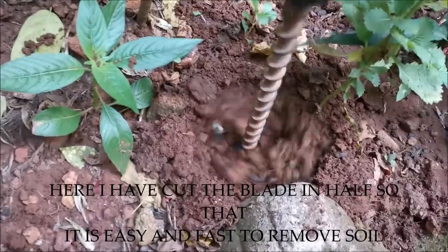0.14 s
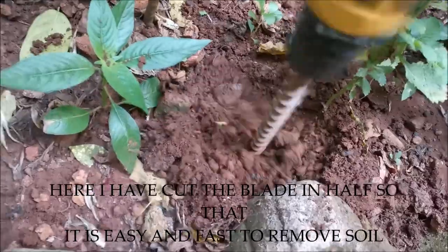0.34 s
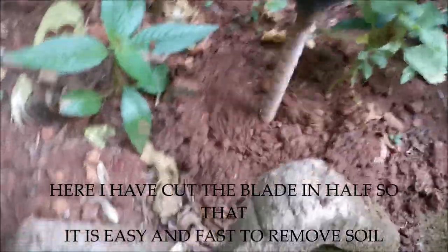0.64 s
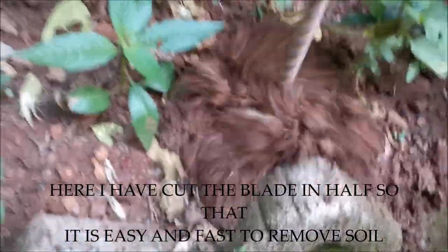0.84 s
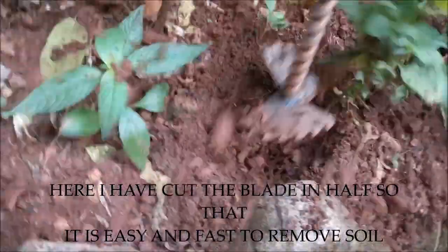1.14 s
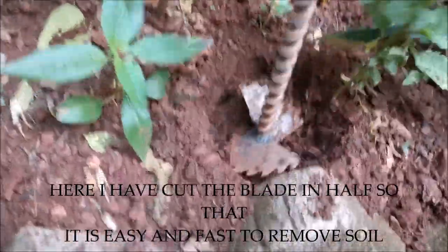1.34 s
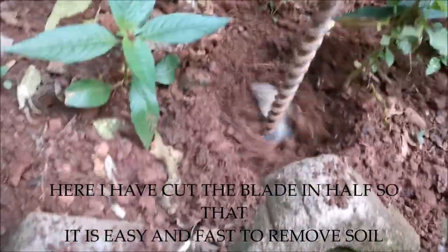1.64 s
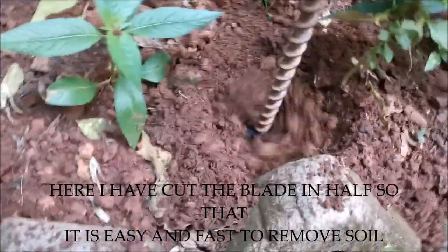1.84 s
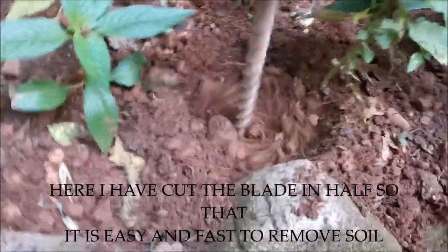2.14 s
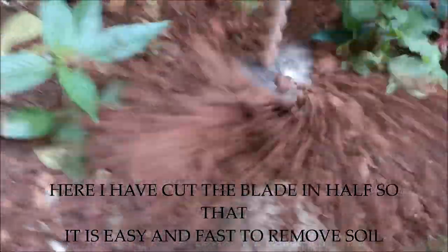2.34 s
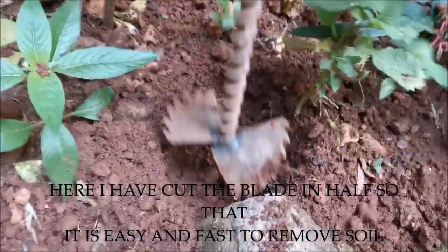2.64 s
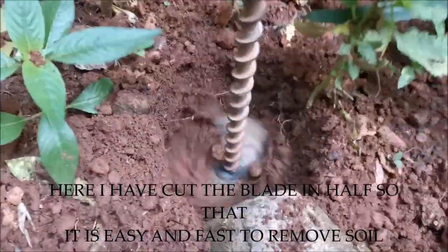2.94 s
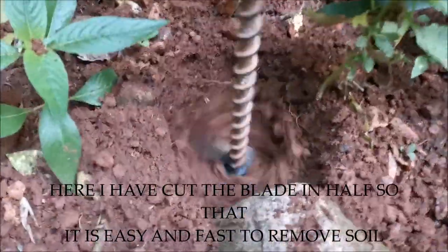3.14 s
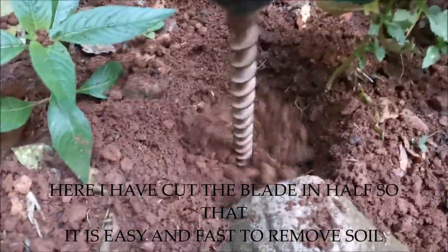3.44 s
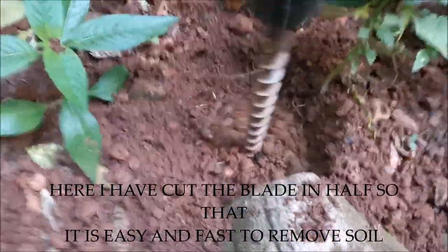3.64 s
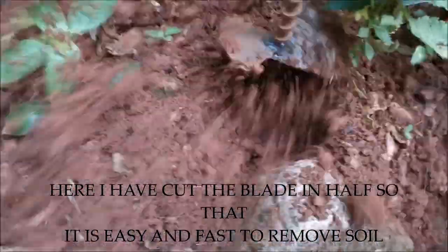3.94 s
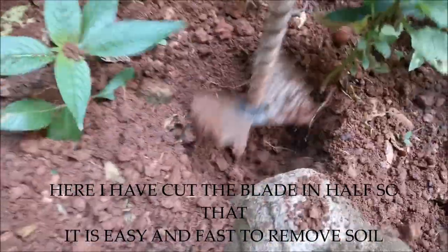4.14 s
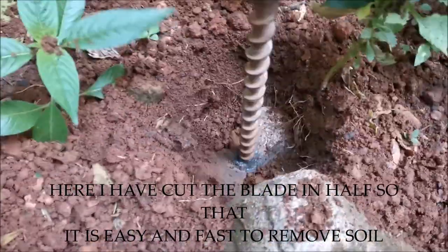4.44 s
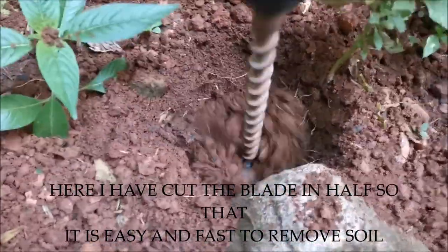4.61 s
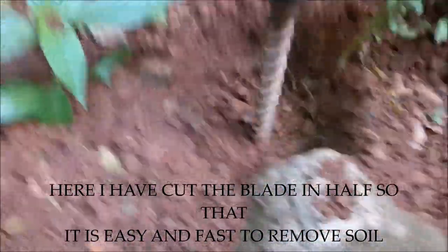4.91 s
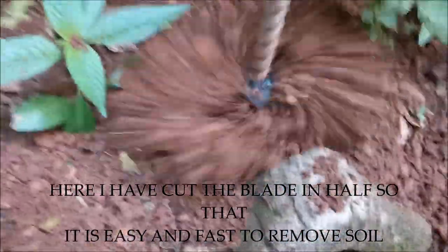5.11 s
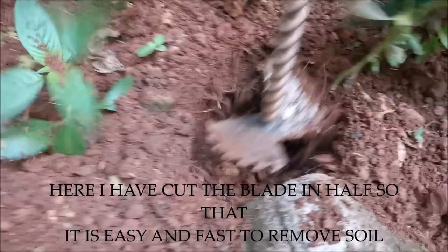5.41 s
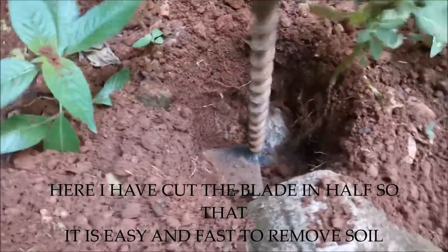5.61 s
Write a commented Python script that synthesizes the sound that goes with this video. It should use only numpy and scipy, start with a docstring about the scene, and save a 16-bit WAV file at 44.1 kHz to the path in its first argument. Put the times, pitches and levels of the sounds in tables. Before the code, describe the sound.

A hand-held electric drill turns a digging blade in earth, recorded near, dry and slightly dull on top. It revs, clacks, whines and rasps, its pitch dipping and recovering under load, then brakes with a falling growl. This happens four times, with quiet gaps of dull thuds, crunches, small pebble ticks and trickling dirt over faint still air.

```python
"""Outdoors, close to a camera: a cordless drill spins a home-made auger into loose soil in four bursts.
Each burst starts with a squeal and a clack; hum and whine follow the motor speed, which sags as the blade bites.
Grains of noise, throbbing with the rotor, make the rattle, scrape and hiss.
Short noise bursts make the clacks, the blade's knocks in the hole and its ticks; thrown crumbs trickle down."""
import sys
import numpy as np
from scipy import signal
from scipy.fft import rfft, irfft, next_fast_len
from scipy.io import wavfile
from scipy.ndimage import uniform_filter1d, map_coordinates

SR = 44100
rng = np.random.default_rng(int(sys.argv[2]) if len(sys.argv) > 2 else 0)


def store_wav(level_fs):
    """Save 16-bit WAV to argv[1]."""
    pcm = np.round(np.clip(np.atleast_2d(level_fs), -1, 1) * 32767)
    wavfile.write(sys.argv[1], SR, pcm.T.astype(np.int16))


N = 254456
TIME = np.arange(N) / SR  # seconds

# pulls of the trigger: (motor starts [s], spindle catches [s], motor stands [s])
PULLS = [(.062, .128, 1.172), (1.645, 1.708, 2.577), (3.006, 3.074, 4.062), (4.624, 4.685, 5.405)]
# grip and soil change the mix of each burst:
# (hum trim [dB], gear line 1, 2, 3 trims [dB], scrape trim [dB], coasting rattle level [dB])
PULL_MIX = [(-2, 3, -0.68, 0.5, -1, -47.5), (-1.5, 0.5, -1, -9.5, -1.5, -41.5), (1, -3, 1.6, 3.5, 0, -48.5),
            (0.5, -4, 0, -2.5, -1, -39.5)]
# blade and clods hit the ground, levels before the layer trims:
# (time [s], crunch level [dB], thud level [dB], time to fall 60 dB [s])
GROUND_KNOCKS = [(.29, -25.5, -35, 0.14), (.835, -44, -37, 0.088), (1.237, -51, -30.5, 0.026),
                 (1.358, -44, -40, 0.078), (1.388, -32.5, -37, 0.12), (1.579, -40, -62, 0.047),
                 (2.794, -51, -29.5, 0.041), (2.823, -59, -42, 0.088), (2.9, -65, -35, 0.025),
                 (2.929, -56, -45, 0.03), (3.307, -35, -29.5, 0.058), (3.485, -29, -26, .071),
                 (4.139, -40.5, -66, 0.099), (4.24, -32, -53, .072), (4.312, -37, -89, 0.041),
                 (4.41, -47, -82, 0.022), (5.5426, -29, -40, 0.064), (5.553, -34.5, -39, 0.096),
                 (5.582, -57, -39.5, 0.094)]

FREE_SPEED = 260  # motor turns per second with no load
REV_ATTACK_S, REV_RELEASE_S = .022, .013  # the surge of the run-up comes and goes
COAST_S, COAST_PEAK_S = .34, .066  # before the stand: the gears begin to run slack, and rattle most
REV_RATTLE_DB, REV_SCRAPE_DB = -40.5, -44  # what the surge adds, before any layer trim
RATTLE_DB = -4.5  # against the drive


def amp(db):
    """Turn decibels into gain."""
    return 10 ** (np.asarray(db) / 20)


def unit(x):
    """Scale to an rms (average strength) of 1."""
    return x / np.sqrt(np.mean(x ** 2) + 1e-20)


def ramp(times, values):
    """Draw straight lines through a few moments, one value per sample."""
    return np.interp(TIME, times, values)


def curves(rows):
    """Give one value per sample for each column after the time."""
    times, *columns = np.transpose(rows)
    return [ramp(times, column) for column in columns]


def along(points, hz):
    """Read (frequency [Hz], level [dB]) points on a log frequency axis."""
    f, db = np.transpose(points)
    return np.interp(np.log(hz + 1), np.log(f), db)


def dying(start, db, db_per_s):
    """Make a gain that sets in at start and falls steadily in decibels."""
    age = TIME - start
    return (age > 0) * amp(db - db_per_s * np.abs(age))


def wobble(rate):
    """Draw a smooth random curve with rate knots a second."""
    knots = rng.standard_normal(int(N * rate / SR) + 4)
    return map_coordinates(knots, [np.arange(N) * rate / SR])


def colour(x, points):
    """Filter to a spectrum of (frequency [Hz], level [dB]) points, with unit power gain and no pre-echo."""
    m = 2 * next_fast_len(N // 2 + 8192, True)
    hz = np.fft.rfftfreq(m, 1 / SR)
    top_hz = points[-1][0]
    gain = amp(along(points, hz)) / (1 + (hz / (2 * top_hz)) ** 4)
    # folding the cepstrum makes the filter answer only after its input
    cepstrum = irfft(np.log(unit(gain) + 1e-6))
    cepstrum[1:m // 2] *= 2
    cepstrum[m // 2 + 1:] = 0
    return irfft(rfft(x, m) * np.exp(rfft(cepstrum)), m)[:N]


def patchy(x, depth_db):
    """Let the colour drift in smooth random patches, as contact points shift."""
    z = signal.stft(x, nperseg=512)[2]
    field = uniform_filter1d(rng.standard_normal(z.shape), size=4, axis=0)
    field = uniform_filter1d(field, size=12, axis=1)
    return signal.istft(z * amp(depth_db * unit(field)), nperseg=512)[1][:N]


def grains(rate, spread_db):
    """Scatter tiny random impacts of uneven size, about rate a second, at rms 1."""
    hits = rng.random(N) < rate / SR
    return unit(hits * rng.standard_normal(N) * amp(spread_db * rng.standard_normal(N)))


def noise_bursts(rows, rise):
    """Swell noise within about rise seconds and let it die, from rows (time [s], level [dB], fall time [s])."""
    out, t = np.zeros(N + SR), np.arange(SR // 4) / SR
    for s, db, t60 in rows:
        shape = amp(db - 60 * t / t60) * (1 - np.exp(-t / rise))
        out[round(s * SR):][:len(t)] += shape * rng.choice([-1, 1], len(t))
    return out[:N]


def tone(angle, smear, flutter_db, rate):
    """Sound a sine whose phase and strength shake with the play of the gears."""
    sine = np.sqrt(2) * np.sin(angle + smear * wobble(rate))
    return sine * unit(amp(flutter_db * wobble(rate)))


def chatter(angle, depth_db, repeat):
    """Make contact noise that throbs once a turn; the share repeat comes round again with the worn surfaces."""
    surface = unit(signal.resample(rng.standard_normal(96), 1024))
    turns = angle / (2 * np.pi) + .0025 * wobble(90)
    worn = np.interp(turns, np.arange(len(surface)) / len(surface), surface, period=1)
    noise = np.sqrt(1 - repeat) * grains(rate=16000, spread_db=2.5) + np.sqrt(repeat) * worn / 2
    return noise * amp(depth_db * (np.sin(angle + wobble(60)) + .77 * wobble(70)))


def motor_speed():
    """Turns a second: the motor runs up, is held back by the soil, then brakes evenly."""
    # speed that the soil allows, one curve a burst: (time [s], speed [motor turns per second])
    soil_limits = [
        [(0.16, 228.0), (0.253, 253.0), (0.32, 203.0), (0.37, 195.0), (0.405, 180.0), (0.43, 190.0),
         (0.47, 150.0), (0.525, 124.0), (0.543, 137.0), (0.576, 134.0), (0.603, 114.5), (0.635, 140.0),
         (0.683, 179.0), (0.75, 171.0), (0.85, 200.0), (0.938, 183.0), (0.99, 198.0), (1.07, 230.0)],
        [(1.77, 242.0), (1.94, 228.5), (1.97, 199.0), (2.09, 187.0), (2.18, 181.0), (2.24, 198.0),
         (2.268, 188.0), (2.345, 195.0), (2.42, 250.0)],
        [(3.12, 233.0), (3.28, 237.0), (3.375, 190.0), (3.415, 202.0), (3.47, 183.0), (3.532, 193.0),
         (3.555, 175.0), (3.592, 186.5), (3.642, 167.0), (3.696, 183.5), (3.736, 161.0), (3.775, 179.0),
         (3.823, 118.0), (3.865, 144.0), (3.9, 192.0), (3.965, 224.0)],
        [(4.73, 209.0), (4.865, 182.0), (4.93, 196.5), (4.96, 179.5), (5.01, 127.5), (5.06, 179.0),
         (5.114, 192.5), (5.16, 139.0), (5.2, 189.0), (5.285, 232.0)],
    ]
    spin_up_s = .04  # time constant of the run-up
    brake_per_s = 2850  # turns per second lost each second on the brake
    speed = np.zeros(N)
    for (start, _, stop), limit in zip(PULLS, soil_limits):
        run_up = FREE_SPEED * (1 - np.exp(-np.maximum(TIME - start, 0) / spin_up_s))
        brake = brake_per_s * np.maximum(stop - TIME, 0)
        speed += np.min([run_up, curves(limit)[0], brake], axis=0)
    rounded = uniform_filter1d(speed, size=300).clip(0)  # inertia rounds each change
    return rounded * (1 + .00597 * wobble(45))


def phases():
    """Gains through every burst: surge of the run-up, drive of the motor, grinding, coasting."""
    # how hard the drill works, one curve a burst, before fades and layer trims:
    # (time [s], treble hiss level [dB], grinding middle level [dB])
    work_levels = [
        [(0.15, -42, -41), (0.182, -36.5, -41), (0.346, -33.5, -39.5), (0.434, -37.5, -30), (0.644, -37, -27.5),
         (0.656, -35.5, -31), (0.776, -38, -40.5), (0.842, -34, -34), (1.004, -35, -40.5),
         (1.096, -50.5, -50.5), (1.15, -64, -64)],
        [(1.73, -42, -43), (1.926, -32, -34.5), (1.934, -30.5, -30), (2.162, -34, -33.5), (2.178, -34, -25.5),
         (2.198, -33, -30.5), (2.252, -32.5, -28.5), (2.262, -33.5, -27.5), (2.386, -36, -48.5),
         (2.444, -50, -55), (2.55, -59.5, -52)],
        [(3.09, -40.5, -45.5), (3.164, -35, -34.5), (3.396, -33.5, -35.5), (3.47, -31.5, -28),
         (3.708, -36.5, -32), (3.726, -34, -27), (3.836, -42, -38), (3.856, -44, -29.5), (3.952, -46, -46.5),
         (4.024, -63, -62), (4.04, -65, -80)],
        [(4.69, -34.5, -31), (4.7, -31.5, -33.5), (4.872, -32.5, -28), (4.906, -33.5, -30.5),
         (5.04, -35.5, -25), (5.072, -30.5, -28), (5.166, -35, -29), (5.26, -35.5, -48.5), (5.272, -44.5, -55),
         (5.344, -56.5, -53), (5.39, -59, -68)],
    ]
    surge, drive, grind, coast = np.zeros((4, N))
    for (start, catch, stop), (*_, coast_db), levels in zip(PULLS, PULL_MIX, work_levels):
        treble_db, middle_db = curves(levels)
        powered = ramp([start + REV_ATTACK_S / 2, catch, stop - COAST_PEAK_S, stop], [0, 1, 1, 0])
        surge += ramp([start, start + REV_ATTACK_S, catch, catch + REV_RELEASE_S], [0, 1, 1, 0]) ** 2
        drive += amp(treble_db) * powered
        grind += amp(middle_db) * powered
        coast += amp(coast_db) * ramp([stop - COAST_S, stop - COAST_PEAK_S, stop], [0, 1, 0])
    return surge, drive, grind, coast


def burst_gains():
    """Each burst's own gain for the hum, three gear lines and scrape, one value per sample."""
    starts = [start for start, _, _ in PULLS]
    current = np.maximum(np.searchsorted(starts, TIME) - 1, 0)
    return amp(np.array(PULL_MIX)[current, :-1].T)


def open_air():
    """Soft, slowly wavering noise stands for the still air outdoors."""
    # spectrum of the air: (frequency [Hz], relative level [dB])
    air_spectrum = [(20, -16.5), (45, -6), (100, 2), (160, -7), (300, -15.5), (600, -13.5), (1500, -22),
                    (4000, -22), (8000, -25.5)]
    return amp(-63.5 + .63 * wobble(7.8)) * unit(colour(rng.standard_normal(N), air_spectrum))


def squeal(pitch_hz=3800):
    """The windings squeal as the trigger is squeezed, swelling until just after the rotor starts to turn."""
    lead_s, lag_s = .031, .041  # begins before the motor starts and ends after
    swell = sum(ramp([start - lead_s, start + lag_s / 2, start + lag_s], [0, 1, 0]) ** 1.53
                for start, *_ in PULLS)
    return amp(-44) * swell * tone(2 * np.pi * pitch_hz * TIME, smear=.98, flutter_db=1.5, rate=790)


def housing_hum(angle, speed, surge):
    """The housing hums three times a motor turn, loudest where the speed meets its resonance."""
    # how strongly the housing hums: (frequency [Hz], level before trims [dB])
    housing_response = [(250, -69.5), (400, -55.5), (480, -44), (535, -41), (580, -30.5), (620, -41.5),
                        (690, -51), (780, -68.5)]
    turning = sum(ramp([start, start + REV_ATTACK_S, stop - .1, stop], [0, 1, 1, 0])
                  for start, _, stop in PULLS)
    # the hum sinks once the trigger is let go, until the brake bites
    released = sum(ramp([stop - .2, stop - .11, stop - .08], [0, 1, 0]) for _, _, stop in PULLS)
    level_db = along(housing_response, 3 * speed) + 6 * surge - 2.5 * released
    return turning * burst_gains()[0] * amp(level_db) * tone(3 * angle, smear=.2, flutter_db=1.1, rate=110)


def mesh(angle, ratio, play, skirt):
    """One gear line: the more play between the teeth, the wider its skirt of sidebands."""
    # the slow planet carrier and each motor turn sway the teeth
    sway = .4 * np.sin(angle / 5.5) + .2 * np.sin(angle)
    phase = ratio * angle + play * sway
    line = tone(phase, smear=.2 + .29 * play, flutter_db=3.5, rate=130)
    sidebands = np.sin(phase) * wobble(650) + np.cos(phase) * wobble(650)
    return (line + skirt * play * sidebands) / np.sqrt(1 + (skirt * play) ** 2)


def gear_whine(angle, speed, surge, grind):
    """Gear teeth sing and ring their case, loudest where the speed carries them through a resonance."""
    # gear lines: (cycles per motor turn [ratio], sideband skirt [share])
    gear_lines = [(9.3, .7), (18.33, .45), (27.3, .6)]
    # case resonances, one curve a gear line: (frequency [Hz], level before trims [dB])
    line_responses = [
        [(1100, -51.5), (1250, -42.5), (1500, -51), (1700, -39.5), (1820, -32), (2000, -37), (2180, -34),
         (2350, -42)],
        [(2150, -47.5), (2500, -36), (2750, -29.5), (3050, -31), (3350, -34), (3600, -43), (4050, -50.5),
         (4330, -32.5), (4550, -52)],
        [(3200, -29), (3500, -28.5), (3800, -36.5), (4200, -47), (4550, -37), (4850, -41), (5130, -35.5),
         (5500, -47), (6800, -51.5)],
    ]
    # spectrum of the gear case under load: (frequency [Hz], relative level [dB])
    case_spectrum = [(1100, -24), (1600, -10.5), (1830, 2), (2050, -5.5), (2450, -7.5), (2800, -24)]
    full_grind_db = -31  # level of the middle in steady digging
    line_gains = burst_gains()[1:4]
    # teeth press together once the spindle has caught, and part as the trigger is let go
    engaged = sum(ramp([catch, catch + .06, stop - .17, stop - .12], [0, 1, 1, 0])
                  for _, catch, stop in PULLS)
    pressure = engaged * (grind / amp(full_grind_db)) ** .6
    # they sing cleanest near a stall and chatter most around 200 turns a second
    play = np.interp(speed, [130, 180, 200, 228], [.2, .7, 1, .6])
    teeth = np.zeros(N)
    for (ratio, skirt), response, gain in zip(gear_lines, line_responses, line_gains):
        level_db = along(response, ratio * speed) + 1.1 * wobble(21.938)
        teeth += gain * amp(level_db) * mesh(angle, ratio, play, skirt)
    case_gain = line_gains[0] * amp(along(line_responses[0], gear_lines[0][0] * speed) - 1.5)
    case = case_gain * play * unit(colour(chatter(angle, depth_db=3.0, repeat=.3), case_spectrum))
    return pressure * teeth + (pressure + .19 * surge) * case  # the run-up rings the case a little


def gear_rattle(angle, surge, drive, coast):
    """Driven gears rattle; undriven ones run slack and growl lower."""
    # spectra of driven and slack gears: (frequency [Hz], relative level [dB])
    driven_spectrum = [(60, -49), (170, -13), (330, -9.5), (480, -4.5), (590, 3.5), (720, -3.5), (860, 2.5),
                       (1080, -3), (1400, 3), (1800, 5), (2300, -14.5), (3200, -31)]
    slack_spectrum = [(100, -22.5), (380, -13.5), (640, 4), (800, -3), (1050, -2), (1550, 0.5),
                      (1850, -17.5), (2300, -18), (3200, -35)]
    driven_gain = amp(RATTLE_DB) * drive + amp(REV_RATTLE_DB) * surge
    driven_gain = driven_gain * amp(.88 * wobble(25))
    slack_gain = coast + amp(REV_RATTLE_DB) * surge + amp(-18.5) * drive
    driven = unit(colour(chatter(angle, depth_db=2.5, repeat=.15), driven_spectrum))
    slack = unit(colour(chatter(angle, depth_db=2.5, repeat=.58), slack_spectrum))
    return driven_gain * driven + slack_gain * slack


def scrape_gain(speed, surge, grind):
    """Gain of the blade against the soil: towards a stall the scrape gives way to the singing teeth."""
    load = np.clip(1 - speed / FREE_SPEED, 0, .5) * (1 - surge)
    return burst_gains()[-1] * amp(2 - 10 * load) * grind + amp(REV_SCRAPE_DB) * surge


def blade_scrape(angle, contact):
    """The blade scrapes the soil: contact noise whose colour drifts in patches."""
    # spectrum of the scrape: (frequency [Hz], relative level [dB])
    scrape_spectrum = [(1200, -28.5), (1900, 0.5), (2300, 1.5), (2700, 3.5), (3300, 2), (3900, 2.5),
                       (4500, 4), (5500, -17.5)]
    rasp = colour(chatter(angle, depth_db=.5, repeat=.43), scrape_spectrum)
    return contact * unit(patchy(rasp, depth_db=4.5))


def brush_and_fan_hiss(angle, speed, surge, drive):
    """Brushes and fan hiss; the surge's share grows with the square of the speed."""
    # spectrum of the hiss: (frequency [Hz], relative level [dB])
    hiss_spectrum = [(3200, -33), (4400, -1), (5100, 4.5), (5900, 5.5), (6900, 7), (7500, -1),
                     (8000, -25.5)]
    gain = amp(1) * drive + amp(-41.5) * surge * (speed / FREE_SPEED) ** 2  # 1 dB above the drive
    hiss = colour(chatter(angle, depth_db=.5, repeat=.15), hiss_spectrum)
    return gain * unit(patchy(hiss, depth_db=2.0))


def rotor_lines(angle, surge, drive, coast):
    """The spinning rotor adds faint tones at whole multiples of its speed."""
    # rotor tones: (multiple of motor speed [ratio], level against the rattle before trims [dB])
    rotor_tones = [(1, -21.5), (2, -23), (4, -25), (5, -24), (6, -13), (7, -26), (8, -21), (10, -20),
                   (15, -16), (21, -30), (24, -15)]
    rattle_gain = amp(RATTLE_DB) * drive + amp(REV_RATTLE_DB) * surge
    lines = sum(amp(db) * tone(round(k) * angle, smear=.81, flutter_db=3, rate=25) for k, db in rotor_tones)
    return (amp(-2.0) * rattle_gain + amp(-14) * coast) * lines


def shaken_earth(contact):
    """The blade shakes the earth: a low rumble of sparse grains that follows the scrape."""
    # spectrum of the earth: (frequency [Hz], relative level [dB])
    earth_spectrum = [(30, -16.5), (80, -7.5), (160, 6.5), (260, 2), (500, -6), (1000, -40)]
    gain = contact * amp(-24.0 + 3.0 * wobble(11))
    return gain * unit(colour(grains(rate=460, spread_db=2.0), earth_spectrum))


def trickle():
    """Gain of moving crumbs: thrown soil runs back and thins out; each knock scuffs and sheds more."""
    shed_db, shed_t60_s = -15.5, .28  # crumbs shaken loose, against the knock
    scuff_s, scuff_db = .029, -17.5  # the blade scuffs the soil around the knock, against the knock
    flow = sum(dying(stop - COAST_PEAK_S, db=-56, db_per_s=23.5) for _, _, stop in PULLS)
    for s, crunch_db, thud_db, _ in GROUND_KNOCKS:
        db = (crunch_db + thud_db) / 2
        flow = flow + dying(s, db + shed_db, 60 / shed_t60_s)
        flow = flow + amp(db + scuff_db) * ramp([s - scuff_s, s, s + scuff_s], [0, 1, 0])
    return flow


def soil():
    """Each knock is a gritty crunch on a soft thud; crumbs and small clods patter down."""
    # spectra of crunch, thud and crumbs: (frequency [Hz], relative level [dB])
    crunch_spectrum = [(300, -25.5), (900, -15.5), (1600, 1.5), (2400, 2.5), (3500, 5), (4000, -2),
                       (4600, -19), (7500, -29.5)]
    thud_spectrum = [(60, -19.5), (200, -10), (400, -5), (620, -1.5), (850, -5.5), (1300, -5), (2000, -25),
                     (5000, -39.5)]
    crumb_spectrum = [(40, -18), (130, 0.5), (400, 6), (900, -0.5), (2200, 2), (3500, -3), (4800, -5),
                      (7000, -3.5), (8000, -15.5)]
    clods_per_s, clod_db, clod_t60_s = 8.2, 7, .051  # level against the trickle, before layer trims
    flow = trickle()
    clod_times = np.flatnonzero(rng.random(N) < clods_per_s / SR)
    clod_levels = 20 * np.log10(flow[clod_times] + 1e-6) + clod_db
    clods = [(i / SR, db, db, clod_t60_s) for i, db in zip(clod_times, clod_levels)]
    # the blade jerks against the soil just after the start; columns as in GROUND_KNOCKS
    kicks = [(start + .022, -40, -30.5, .03) for start, *_ in PULLS]
    hits = GROUND_KNOCKS + kicks + clods
    crunch = noise_bursts([(s, db, t60) for s, db, _, t60 in hits], rise=.00068)
    crunch = crunch * unit(amp(4.6 * wobble(900)))  # grit
    thud = noise_bursts([(s, db, t60) for s, _, db, t60 in hits], rise=.0016)
    crumbs = grains(rate=9400, spread_db=5.5) + .83 * rng.standard_normal(N)
    crumbs = unit(colour(crumbs, crumb_spectrum))
    crumbs = unit(patchy(crumbs * amp(1.7 * wobble(70)), depth_db=4.0))
    knocks = amp(-3.5) * colour(crunch, crunch_spectrum) + amp(-.5) * colour(thud, thud_spectrum)
    return knocks + flow * crumbs


def clacks():
    """Hard, dead steel contacts inside the drill thump its housing; the shell shivers briefly with each."""
    # the spindle takes up its slack or locks, the trigger clicks:
    # (time [s], steel level [dB], housing thump level [dB], time to fall 60 dB [s])
    steel_contacts = [(0.1285, -15, -16.5, 0.014), (1.7085, -13.5, -19, .012), (2.5868, -20.5, -31, .022),
                      (3.0737, -13, -21, .017), (4.5537, -27.5, -49, 0.0088), (4.666, -19.5, -24, .02)]
    # spectra of the steel and the housing: (frequency [Hz], relative level [dB])
    steel_spectrum = [(400, -13.5), (1200, -11), (2000, 2.5), (2700, 5), (3700, 4), (4800, 1.5),
                      (6500, -0.5), (8000, -7)]
    housing_spectrum = [(120, -35.5), (350, -10.5), (600, -6), (950, 5), (1400, -0.5), (2200, -3),
                        (4000, -24.5)]
    lead_s, touch_db = .0044, -10  # a lighter touch comes before each clack
    touches = [(s - lead_s, steel_db + touch_db, thump_db + touch_db, t60)
               for s, steel_db, thump_db, t60 in steel_contacts]
    contacts = steel_contacts + touches
    steel = noise_bursts([(s, db, t60) for s, db, _, t60 in contacts], rise=.00042)
    shiver = noise_bursts([(s - lead_s, db - 11.5, .045) for s, db, _, _ in contacts], rise=.0053)
    thump = noise_bursts([(s, db, t60) for s, _, db, t60 in contacts], rise=.00021)
    return colour(steel + shiver, steel_spectrum) + colour(thump, housing_spectrum)


def ticks():
    """A tooth of the blade ticks against a pebble: short bright contacts, choked by the soil on the blade."""
    # pebble contacts: (time [s], level [dB], time to fall 60 dB [s])
    pebble_hits = [(1.526, -40, 0.021), (2.742, -34.5, 0.065), (4.224, -37.5, 0.058)]
    # spectrum of the tooth: (frequency [Hz], relative level [dB])
    tooth_spectrum = [(1000, -19), (2600, -14), (3100, -2.5), (3800, 0), (4300, -19), (7000, -31)]
    return colour(noise_bursts(pebble_hits, rise=.0014), tooth_spectrum)


def scene():
    """Drill and soil in still open air, the same in both channels."""
    speed = motor_speed()
    surge, drive, grind, coast = phases()
    angle = 2 * np.pi * np.cumsum(speed) / SR
    contact = scrape_gain(speed, surge, grind)
    mono = open_air()
    mono += housing_hum(angle, speed, surge)
    mono += gear_whine(angle, speed, surge, grind)
    mono += gear_rattle(angle, surge, drive, coast)
    mono += blade_scrape(angle, contact)
    mono += brush_and_fan_hiss(angle, speed, surge, drive)
    mono += rotor_lines(angle, surge, drive, coast)
    mono += shaken_earth(contact)
    mono += squeal()
    mono += clacks()
    mono += ticks()
    mono += soil()
    return np.array([mono, mono])


def record(dry):
    """The camera keeps almost nothing above its band limit."""
    top_hz = 7600
    m = next_fast_len(N + 4096)
    hz = np.fft.rfftfreq(m, 1 / SR)
    return irfft(rfft(dry, m) / (1 + (hz / top_hz) ** 80), m)[:, :N]


dry = scene()
out = record(dry)
store_wav(out)
```